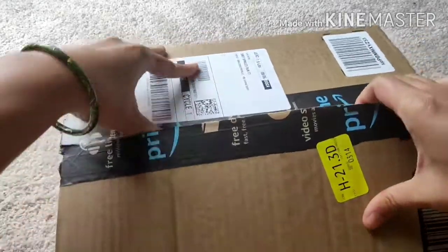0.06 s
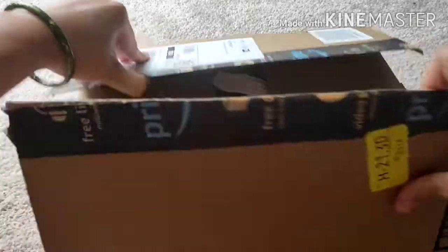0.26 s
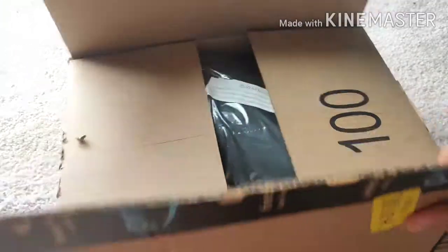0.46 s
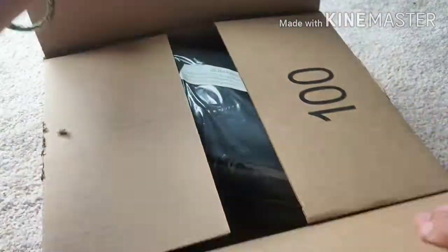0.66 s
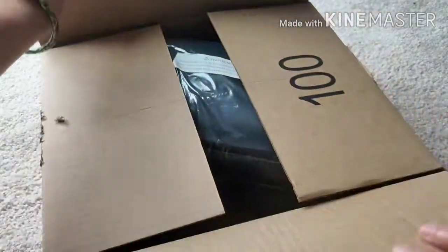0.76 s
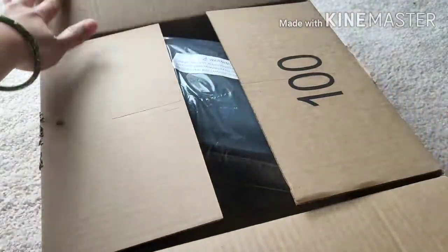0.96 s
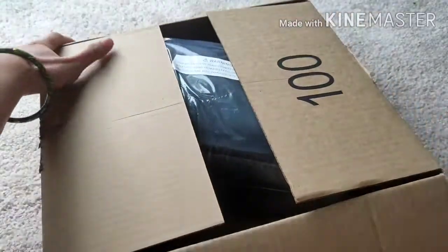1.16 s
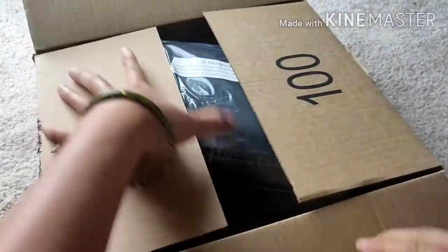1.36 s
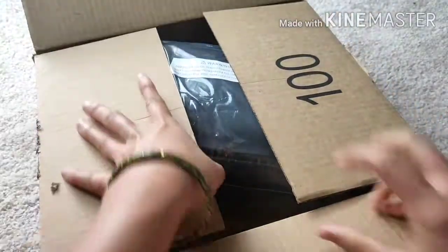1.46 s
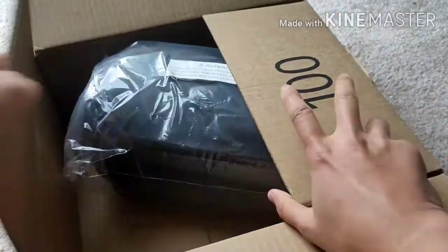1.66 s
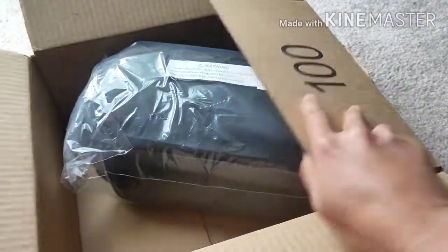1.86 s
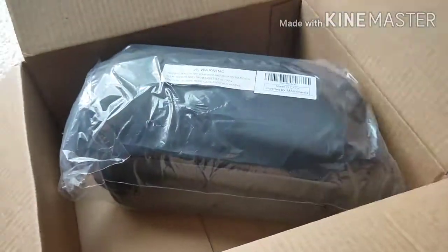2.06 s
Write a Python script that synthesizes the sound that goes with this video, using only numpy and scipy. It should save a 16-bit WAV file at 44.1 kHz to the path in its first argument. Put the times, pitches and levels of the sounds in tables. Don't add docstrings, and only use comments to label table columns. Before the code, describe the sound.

Cardboard box flaps rustle, tap and scrape under hands; a loud hollow pop comes early, quieter handling follows, then a second sharp knock and final scrapes, close to a phone microphone in a small carpeted room.

```python
import sys
import numpy as np
from scipy import signal
from scipy.fft import rfft, irfft
from scipy.io import wavfile
from scipy.ndimage import uniform_filter1d, map_coordinates

SR = 44100
rng = np.random.default_rng(int(sys.argv[2]) if len(sys.argv) > 2 else 0)


def ratio_of_db(decibels):
    return 10 ** (np.asarray(decibels, float) / 20)


def master_out(mix):
    frames = np.transpose(np.atleast_2d(mix))
    ceiling = np.clip(frames, -1, 1)
    pcm = np.round(ceiling * 32767).astype(np.int16)
    wavfile.write(sys.argv[1], SR, pcm)


N = 92610


def level(x, db):
    return x * ratio_of_db(db) / np.sqrt(np.mean(x ** 2))


def curve(table, axis=1):
    return np.interp(np.arange(N) / SR, np.array(table)[:, 0], np.array(table)[:, axis])


def colour(x, table):
    hz, db = np.array(table).T
    log_f = np.log(np.fft.rfftfreq(N, 1 / SR) + 1)
    gain_db = np.interp(log_f, np.log(hz), db, left=-60)
    return irfft(rfft(x) * ratio_of_db(gain_db), N)


def highpass(x, order, hz):
    return signal.lfilter(*signal.butter(order, hz, "high", fs=SR), x)


def band(x, hz, width_hz):
    return signal.lfilter(*signal.iirpeak(hz, hz / width_hz, fs=SR), x)


def double_band(x, hz, width_hz):
    return band(band(x, hz, width_hz), hz, width_hz)


def ring(x, hz, t60):
    pole = np.exp((2j * np.pi * hz - np.log(1000) / t60) / SR)
    return signal.lfilter([1], [1, -pole], x).imag


def walk(rate):
    k = int(SR / rate)
    smooth = uniform_filter1d(rng.standard_normal(N), k)
    return level(uniform_filter1d(smooth, k), 0)


def fall(s, db, ms):
    t = np.arange(N) / SR - s
    return ratio_of_db(db) * (t >= 0) * np.exp(-np.abs(t) * 1000 / ms)


def rumble():
    hum = double_band(rng.standard_normal(N), 44.0, 80.0)
    return level(hum * ratio_of_db(4.0 * walk(4.0)), -98)


# [t/s, level/dB]
HISS_GAIN = [(0.0, -70), (0.39, -70.5), (0.75, -68), (0.88, -65.5), (1.08, -73.5), (1.2, -75.5),
             (1.33, -75), (1.43, -68.5), (2.1, -68)]
# [f/Hz, level/dB per Hz]
HISS_SPECTRUM = [(24, -42.5), (40, -16.5), (204, -7.5), (761, -25), (1040, -13), (1610, -22), (4770, -29),
                 (7330, -10.5), (8990, -24.5), (11700, -32.5), (19800, -120)]


def phone_hiss():
    mid, side = (colour(rng.standard_normal(N), HISS_SPECTRUM) for _ in range(2))
    side = 1.06 * highpass(side, 1, 1200)
    treble = signal.sosfilt(signal.butter(4, [6000, 8500], "band", fs=SR, output="sos"), mid)
    gain_db = curve(HISS_GAIN) + 5.5 - 6.0 + 0.93 * walk(36)
    return np.array([mid + side, mid - side]) / np.std(treble) * ratio_of_db(gain_db)


# [f/Hz, level/dB]
ROOM_SPECTRUM = [(60, -14), (140, -2), (220, -2.5), (330, -4), (620, -12), (950, -7), (1500, -11.5),
                 (9000, -7)]


def room(x):
    ROOM_DB, T60_S, ONSET_S = -11.5, 0.23, 0.0019
    t = np.arange(N) / SR
    decay = ratio_of_db(-60 * t / T60_S) * np.clip(t / ONSET_S, 0, 1)
    mid, side = (colour(n, ROOM_SPECTRUM) * decay for n in rng.standard_normal((2, N)))
    side = 0.083 * side + highpass(side, 1, 900)
    tails = np.array([mid + side, mid - side])[:, :SR // 2]
    tails = tails / np.sqrt(np.sum(tails ** 2) / 2)
    return signal.fftconvolve(x[None], tails, axes=1)[:, :N] * ratio_of_db(ROOM_DB)


# [f/Hz, level/dB]
CRACK_SPECTRUM = [(800, -0.5), (2000, 6.5), (3200, 0.5), (4000, -3), (5200, -3), (7100, 3.5), (8300, 0),
                  (9300, -25.5)]


def crack_hiss():
    both, left, right = (level(colour(n, CRACK_SPECTRUM), 0) for n in rng.standard_normal((3, N)))
    return level(both + np.array([left, right]), 0)


def slips(per_s, spread_db):
    chance, sign, size = rng.random((3, N))
    clicks = (chance < per_s / SR) * np.sign(sign - 0.5)
    return level(clicks * ratio_of_db(-spread_db * np.log(size + 0.01)), 0)


# [f/Hz, width/Hz, level/dB]
PANEL_MODES = [(139.7, 68, -2), (212.6, 106.5, -1.5), (319, 89, 0), (539, 160, -7.5), (760, 250, -14.5),
               (950, 120, -5), (1190, 180, -25), (1800, 400, -20.5)]


def panels(x):
    out = 0
    for k, (hz, width_hz, db) in enumerate(PANEL_MODES):
        out = out + (-1) ** k * ratio_of_db(db) * double_band(x, hz, 2 * width_hz)
    return out


# [t/s, level/dB]
HAND_PRESSURE = [(0.0, -51), (0.18, -62), (0.26, -49), (0.49, -69.5), (0.72, -69), (0.85, -60.5),
                 (1.03, -64), (1.37, -66.5), (1.77, -60), (1.98, -63.5), (2.1, -77)]


def rustle():
    walls = level(panels(slips(1200, 2.2)), 0)
    return walls * ratio_of_db(curve(HAND_PRESSURE) - 0.15 + 2.0 * walk(26))


# [t/s, length/s, level/dB, centre f/Hz, hiss level/dB]
EDGE_SCRAPES = [(0.228, 0.03, -47, 800, -52), (0, 0.095, -71, 1850, -79), (0.375, 0.03, -58, 950, -80),
                (0.47, 0.03, -75, 2000, -72), (0.96, 0.05, -75, 1500, -70), (0.149, 0.046, -54.5, 885, -74),
                (1.248, 0.033, -43.5, 980, -84), (0.267, 0.12, -55, 950, -64.5),
                (0.849, 0.13, -59.5, 693, -60.5), (1.092, 0.072, -55, 406, -70.5),
                (1.238, 0.078, -56, 679, -59.5), (1.36, 0.045, -57, 1000, -74),
                (1.397, 0.05, -56, 950, -72.5), (1.535, 0.22, -60, 996, -89.5),
                (1.642, 0.09, -56, 900, -57), (1.857, 0.051, -48.5, 950, -62), (1.899, 0.1, -57, 887, -62),
                (2.032, 0.053, -59.5, 454, -89), (2.044, 0.085, -69.5, 820, -89),
                (0.454, 0.049, -58.5, 900, -78)]


def scrapes(hiss):
    ATTACK_S, RELEASE_SHARE, FADE_DB, WIDTH_SHARE = 0.0076, 0.24, -8, 0.26
    t, out = np.arange(N) / SR, 0
    grit = slips(2500, 2.2)
    body = level(panels(grit), 0)
    for s, length, db, hz, hiss_db in EDGE_SCRAPES:
        rise = (t - s) / ATTACK_S
        release = (s + length - t) / (RELEASE_SHARE * length)
        fade = ratio_of_db(FADE_DB * np.clip((t - s) / length, 0, 1))
        shape = np.clip(np.minimum(rise, release), 0, 1) * fade
        edge = level(double_band(grit, hz, WIDTH_SHARE * hz), 0)
        out = out + shape * (ratio_of_db(db) * (edge + 0.7 * body) + ratio_of_db(hiss_db) * hiss)
    return out


# [t/s, peak level/dB, ring f/Hz, crack level/dB]
BOX_TAPS = [(0.003, -35.5, 188, -62.5), (0.004, -39.5, 369, -64), (0.032, -43.5, 399, -62),
            (0.056, -50, 390, -74), (0.07, -49, 376, -62), (0.083, -47, 300, -62), (0.066, -48, 400, -70),
            (0.127, -39, 200, -65), (0.282, -35, 340, -80), (0.318, -40, 330, -80),
            (0.167, -47, 385, -71), (0.187, -45, 305, -71), (0.176, -48, 210, -68),
            (0.216, -49, 285, -71.5), (0.416, -51, 322, -81), (0.469, -53, 375, -81),
            (0.505, -50.5, 269, -80), (0.355, -42.5, 280, -82.5), (0.385, -51.5, 200.4, -78.5),
            (0.716, -50, 230, -80), (0.653, -46, 217.7, -71), (0.833, -42, 212, -64),
            (0.846, -38.5, 523, -48), (0.871, -36, 239.4, -52), (0.878, -37, 938, -49),
            (0.901, -40, 142.2, -55.5), (0.934, -35, 237, -52), (1.082, -38, 176.7, -41.5),
            (1.091, -32, 194.8, -46), (1.147, -41, 232, -66.5), (1.26, -35, 227, -56.5),
            (1.269, -43, 225, -61.5), (1.292, -47, 248, -58), (1.385, -55, 514, -70),
            (1.392, -49, 163.7, -65.5), (1.412, -43, 232.5, -59.5), (1.531, -41.5, 298, -57.5),
            (1.611, -35.5, 300, -48), (1.791, -44.5, 218, -51), (1.849, -39, 300, -48),
            (1.905, -50, 200, -65), (1.866, -40.5, 578, -52.5), (1.876, -37.5, 567, -58),
            (1.934, -45, 245, -66), (1.666, -42, 360, -70),
            (.004, -38.5, 800, -62), (.034, -47, 950, -65), (.056, -49, 1000, -60),
              (0.056, -52.5, 1800, -59), (0.082, -41, 910, -68), (0.188, -42, 820, -65),
              (0.175, -47, 880, -63.5), (0.461, -46, 950, -60), (0.486, -55, 900, -62),
              (0.968, -50, 7300, -60), (0.968, -54, 800, -70), (1.091, -48, 4900, -60),
              (0.038, -56, 1850, -75), (1.082, -40.5, 391, -53), (1.094, -40.5, 435, -53),
              (1.149, -40, 632, -52), (1.083, -41.5, 1052, -60), (1.242, -38, 680, -62),
              (1.249, -39, 749, -57), (1.254, -30.5, 970, -60), (1.257, -35, 980, -54.5),
              (1.269, -56, 570, -38.5), (1.532, -47, 980, -62), (1.532, -51.5, 1920, -64),
              (1.864, -36, 980, -60), (1.871, -44.5, 1062, -56), (1.921, -46, 850, -58),
              (1.937, -47.5, 620, -57)]
# [t/s, peak level/dB, edge f/Hz, crack level/dB]
FIRST_SLIPS = [
    (.2309, -29, 870, -38),
    (.2312, -42, 2300, -60),
    (.2338, -34, 290, -62),
    (.2345, -29, 935, -47),
]


def taps(hiss):
    RING_CYCLES, TAP_DB, NEIGHBOURS_DB = 13.4, -8, -6
    CRACK_DB, CRACK_MS = -7.5, 2.7
    out, kicks, crack = 0, 0, 0
    for s, db, hz, crack_db in [*BOX_TAPS, *FIRST_SLIPS]:
        kick = np.zeros(N)
        kick[int(s * SR)] = ratio_of_db(db + TAP_DB)
        soft = band(kick, hz, hz)
        kicks = kicks + soft * SR / hz
        out = out + 2 * ring(soft, hz, RING_CYCLES / hz)
        crack = crack + fall(s, crack_db + CRACK_DB, CRACK_MS)
    thin_hiss = highpass(hiss, 2, 4000)
    return out + panels(kicks) * ratio_of_db(NEIGHBOURS_DB) + crack * thin_hiss


# [t/s, level/dB, contact/ms, crack level/dB, direction]
FIRST_POP = [
    (.2478, -31.5, 0.056, -26, 1),
    (.2500, -25.5, 0.29, -30.5, 1),
    (.2526, -17, 0.32, -46, -1),
    (.2551, -14.5, 0.66, -48, -1),
    (.2567, -6, 0.71, -50, 1),
    (.2601, -15, 0.35, -48.5, 1),
    (.2627, -8.5, 0.62, -55, 1),
]
# [t/s, level/dB, contact/ms, crack level/dB, direction]
SECOND_POP = [
    (1.6325, -22.5, 0.14, -28.5, 1),
    (1.6350, -15.5, 0.38, -68, 1),
    (1.6425, -62.5, 0.66, -42, 1),
]
# [f/Hz, level/dB, t60/s]
SHUT_BOX = [(135, -28.5, 0.25), (159, -11, 0.022), (326.1, -26, 0.12), (340, -5, 0.0062),
            (406, -7.5, 0.043), (899, -30.5, 0.23), (1100, -33.5, 0.16), (700, -18.5, 0.028),
            (900, 3.5, 0.015), (1090, 2, 0.013), (1270, -42.5, 0.019), (1720, -20, 0.025),
            (2140, -35, 0.017)]
# [f/Hz, level/dB, t60/s]
OPEN_BOX = [(158, -17.5, 0.16), (312.7, -3.5, 0.043), (667, -22.5, 0.088), (800, -5, 0.011),
            (951, -2.5, 0.033), (1787, -37, 0.035), (1940, -6.5, 0.035), (3200, -16, .015),
            (4700, -22, .01)]


def pop(strikes, modes, hiss, bass_hz):
    t, push, crack = np.arange(N) / SR, 0, 0
    for s, db, ms, crack_db, way in strikes:
        width = max(ms, 0.05) * SR / 1000
        pulse = np.exp(-((t - s) * SR / width) ** 2) / width
        push = push + np.sign(way) * ratio_of_db(db) * pulse
        crack = crack + fall(s, crack_db, 2.45)
    body = sum(ratio_of_db(db) * ring(push, hz, t60) for hz, db, t60 in modes)
    thud = ratio_of_db(-47) * ring(push, 30.2, 0.12)
    return highpass(body, 3, bass_hz) + crack * hiss + thud


# [t/s, lag of the left port/samples, left over right level/dB]
HAND_PLACE = [(0, 4.5, 1.1), (.2, 5.5, 1), (.26, 4, 0.36), (.5, -6.5, 2.5), (.9, -7.5, 1), (1.2, -8, 1),
              (1.4, -4, 3), (1.6, 8, 0), (1.9, 14, 0.8), (2.1, 11.5, -1.5)]


def two_ports(box):
    half_lag = curve(HAND_PLACE) / 2
    half_db = curve(HAND_PLACE, axis=2) / 2
    ports = []
    for port, way in zip(box, (1, -1)):
        moved = map_coordinates(port, [np.arange(N) - way * half_lag], mode="mirror")
        ports.append(moved * ratio_of_db(way * half_db))
    return np.array(ports)


def scene():
    hiss = crack_hiss()
    box = rustle() + scrapes(hiss) + taps(hiss)
    box = box + pop(FIRST_POP, SHUT_BOX, hiss, 150.0) + pop(SECOND_POP, OPEN_BOX, hiss, 230.0)
    return two_ports(box) + room(box.mean(axis=0)) + phone_hiss() + rumble()


def top_cut(x):
    return signal.sosfilt(signal.butter(12, 9140, fs=SR, output="sos"), x)


def record(dry):
    x = signal.sosfilt(signal.butter(1, 25, "high", fs=SR, output="sos"), dry)
    x = x - 0.55 * band(x, 1440, 320)
    x = signal.sosfilt(signal.ellip(10, 0.3, 60, 8590, fs=SR, output="sos"), x)
    return top_cut(x)


dry = scene()
out = record(dry)
master_out(out)
```